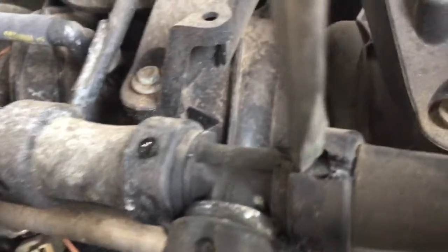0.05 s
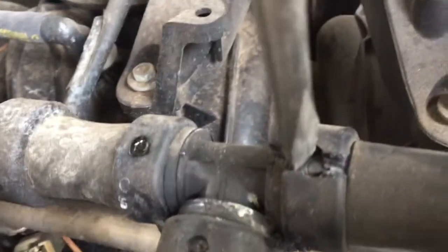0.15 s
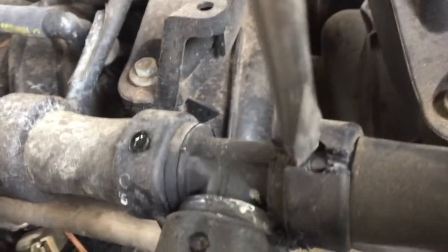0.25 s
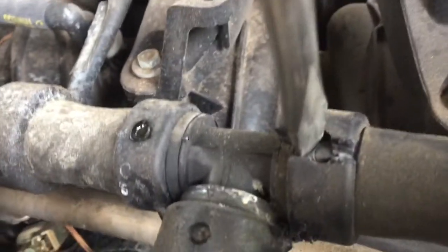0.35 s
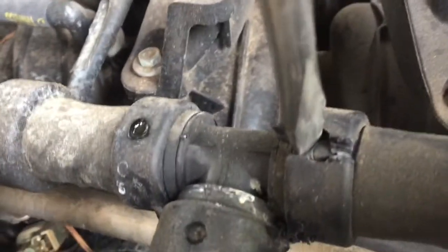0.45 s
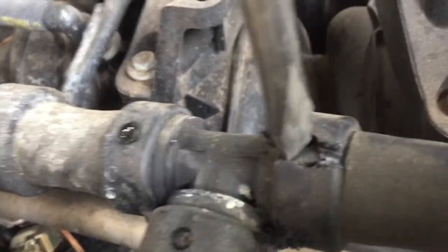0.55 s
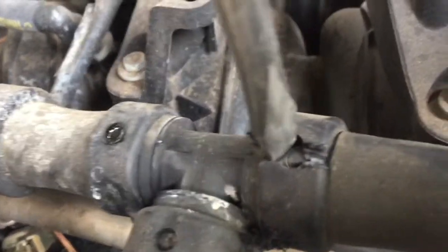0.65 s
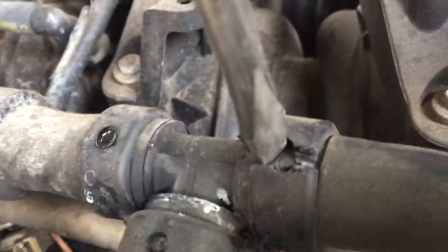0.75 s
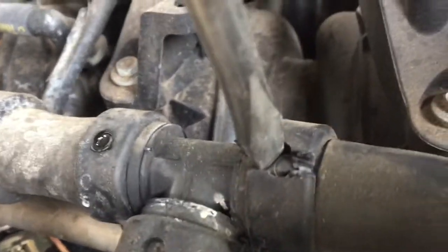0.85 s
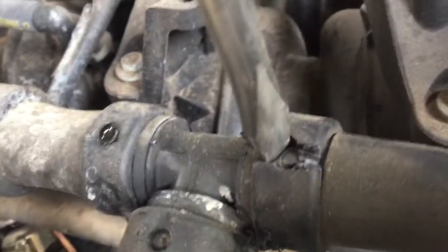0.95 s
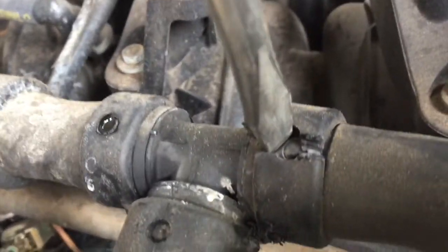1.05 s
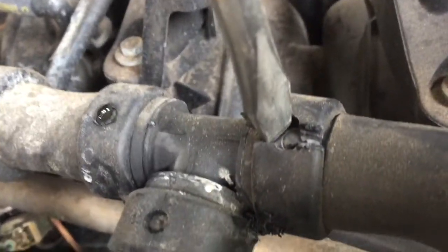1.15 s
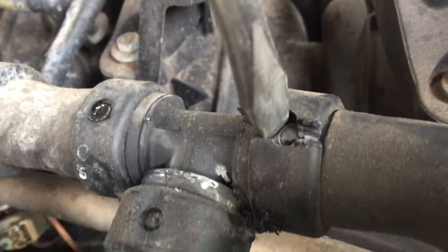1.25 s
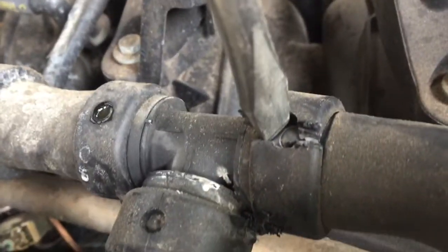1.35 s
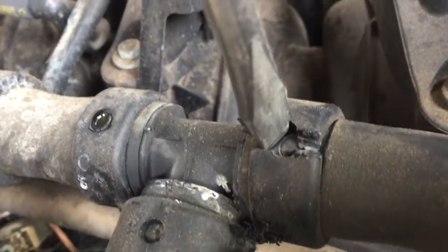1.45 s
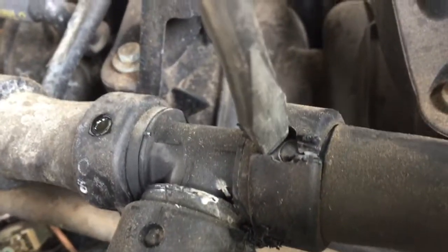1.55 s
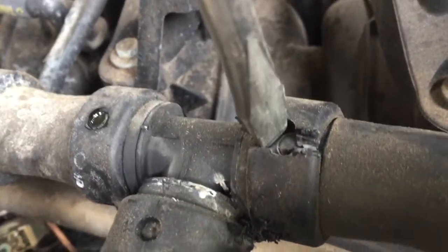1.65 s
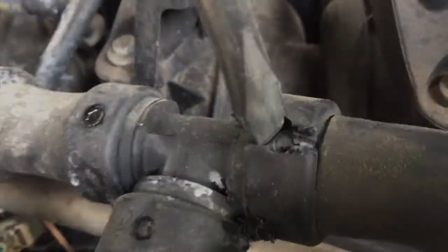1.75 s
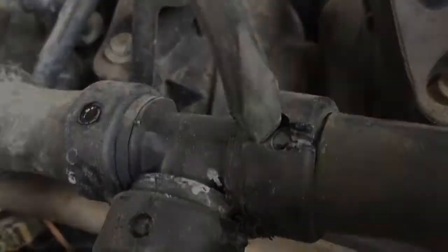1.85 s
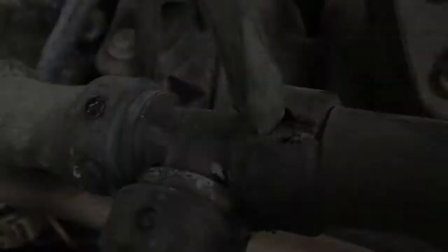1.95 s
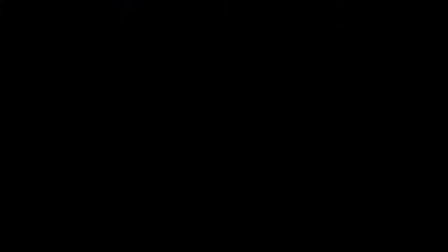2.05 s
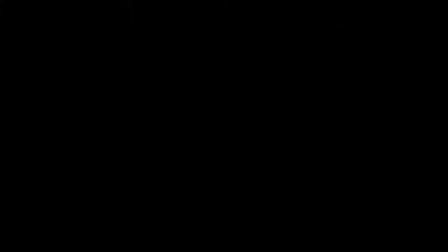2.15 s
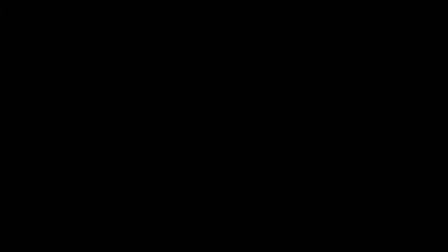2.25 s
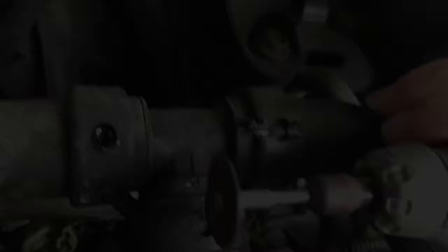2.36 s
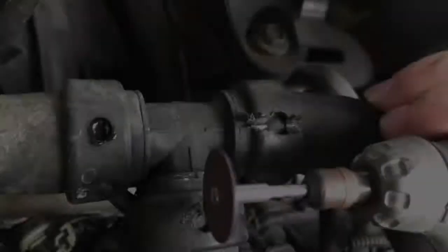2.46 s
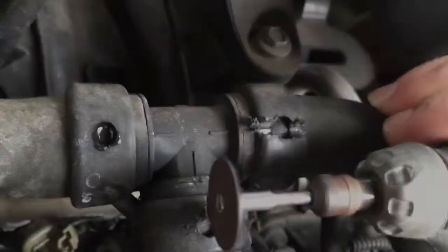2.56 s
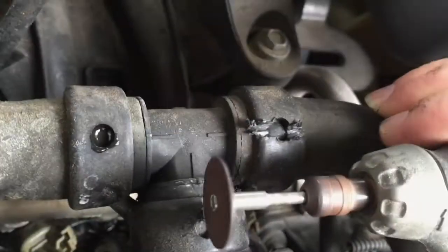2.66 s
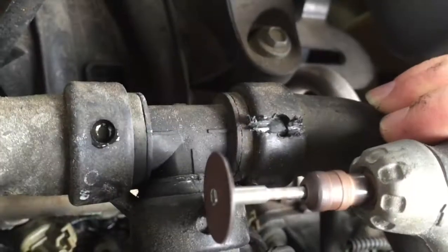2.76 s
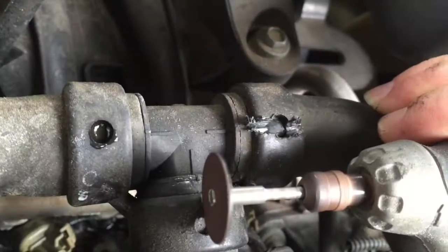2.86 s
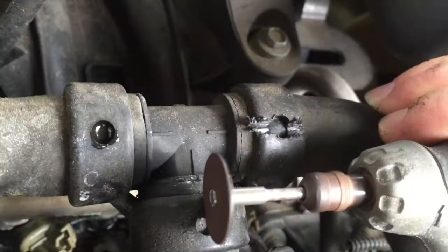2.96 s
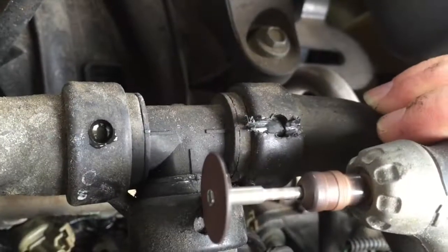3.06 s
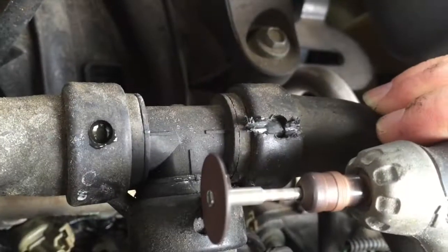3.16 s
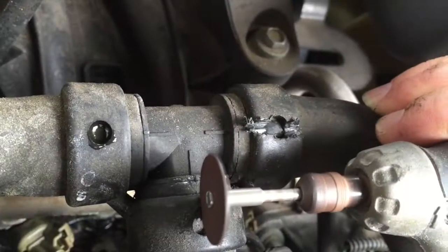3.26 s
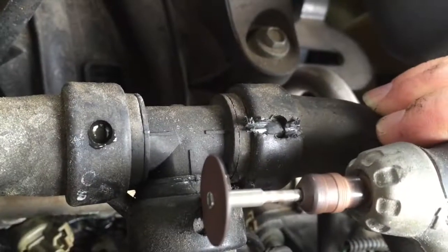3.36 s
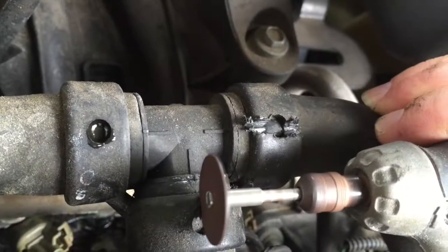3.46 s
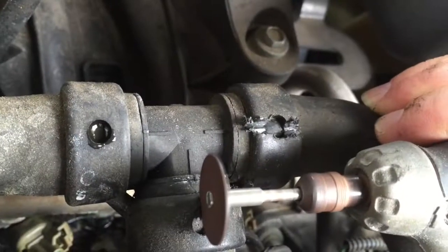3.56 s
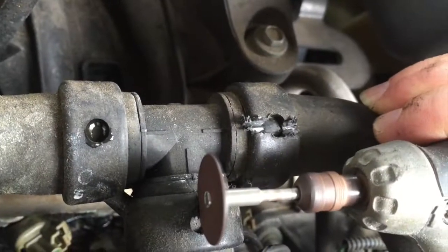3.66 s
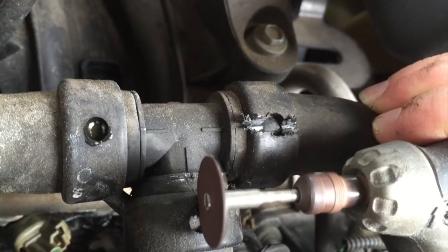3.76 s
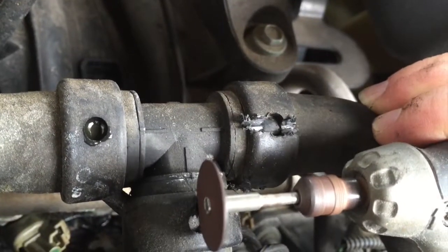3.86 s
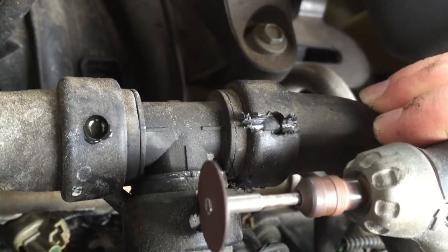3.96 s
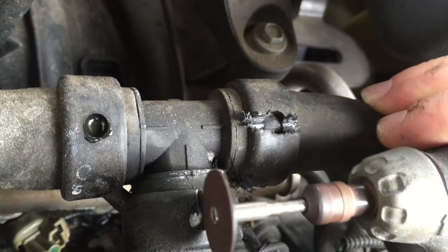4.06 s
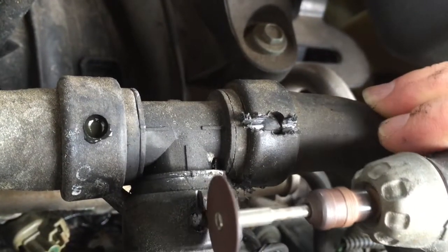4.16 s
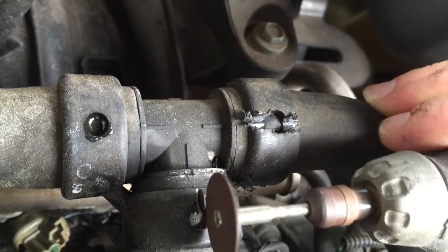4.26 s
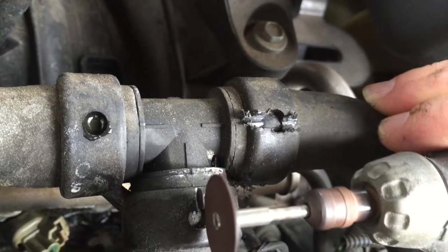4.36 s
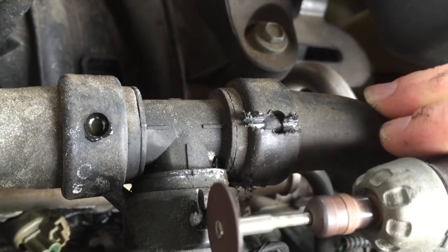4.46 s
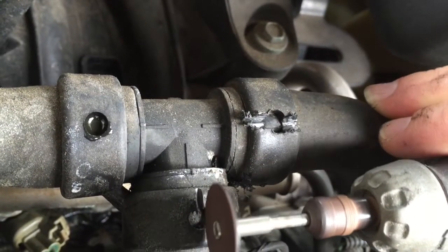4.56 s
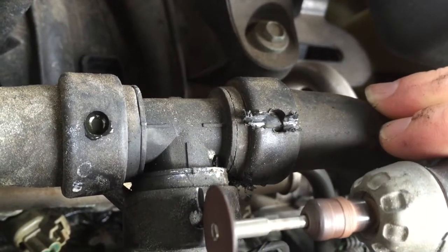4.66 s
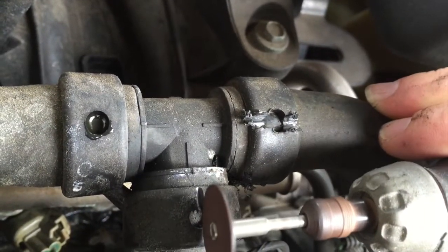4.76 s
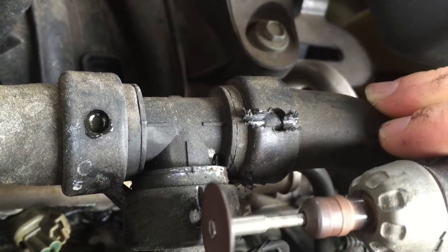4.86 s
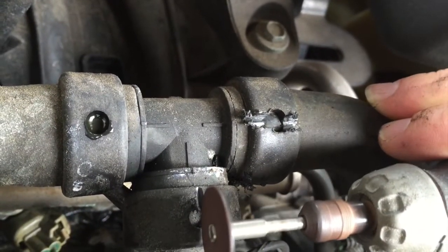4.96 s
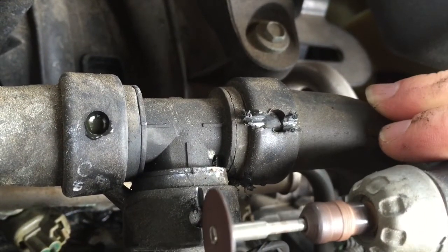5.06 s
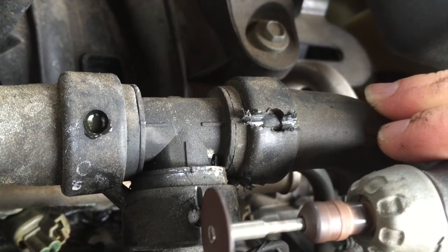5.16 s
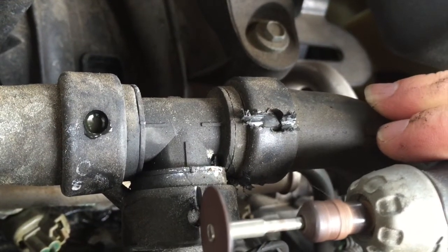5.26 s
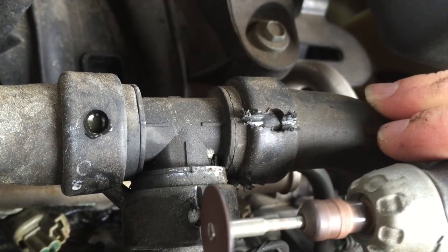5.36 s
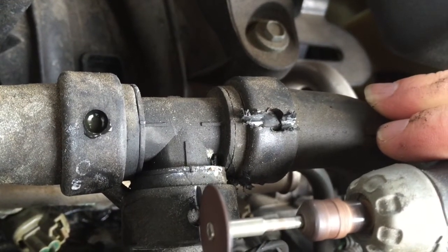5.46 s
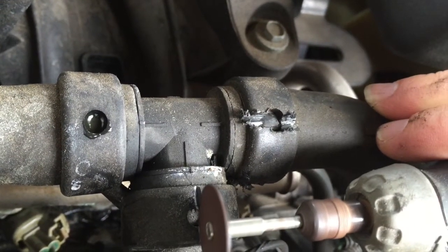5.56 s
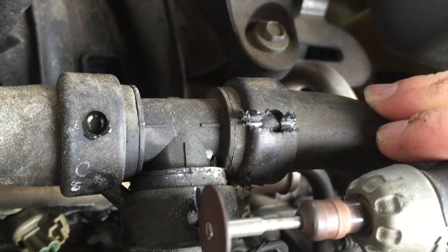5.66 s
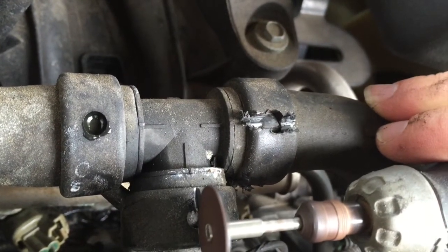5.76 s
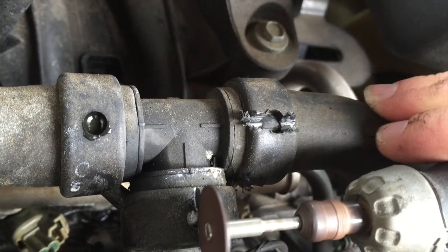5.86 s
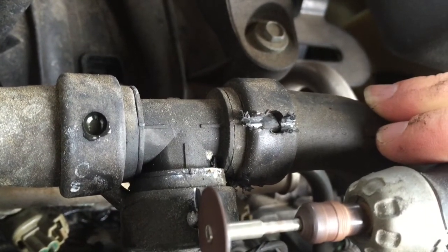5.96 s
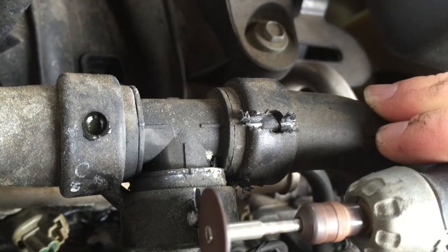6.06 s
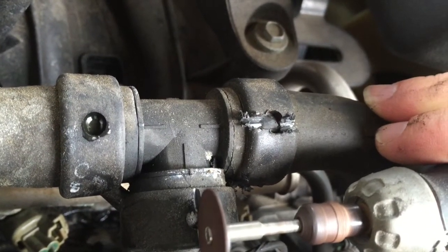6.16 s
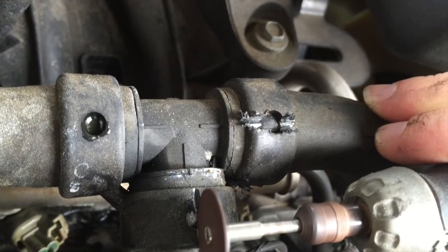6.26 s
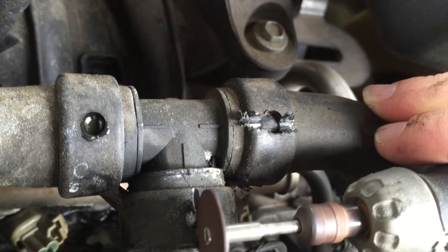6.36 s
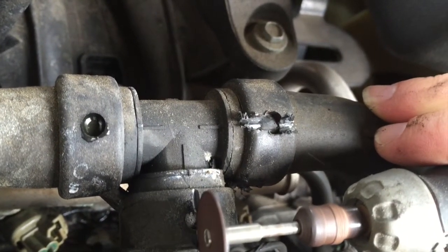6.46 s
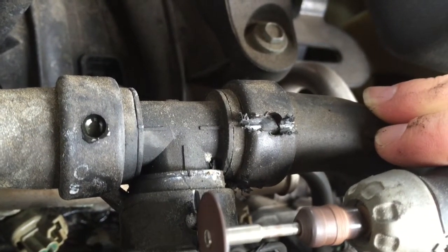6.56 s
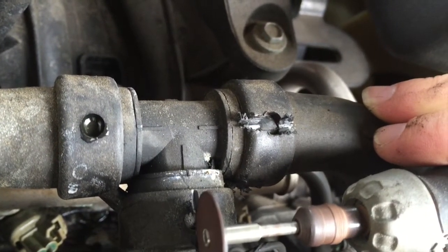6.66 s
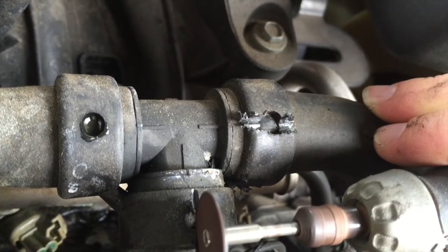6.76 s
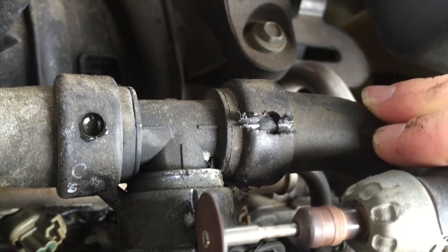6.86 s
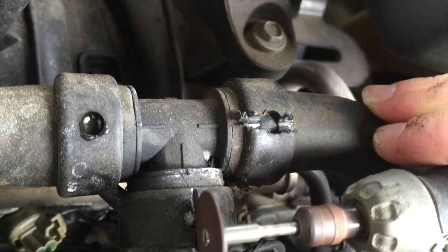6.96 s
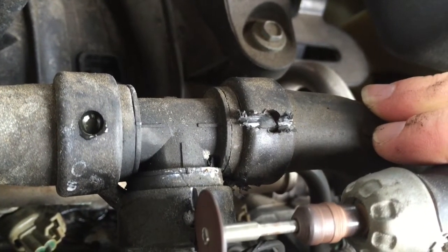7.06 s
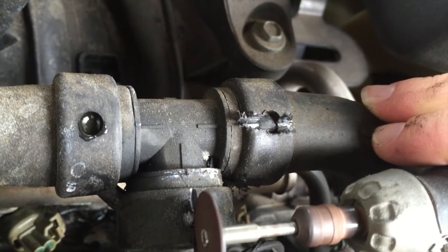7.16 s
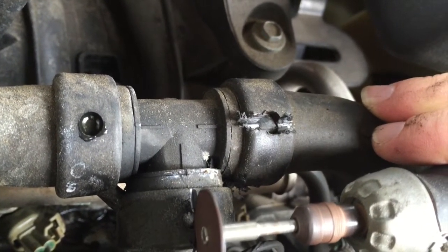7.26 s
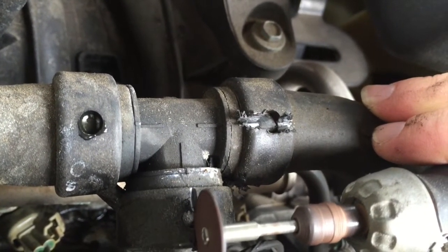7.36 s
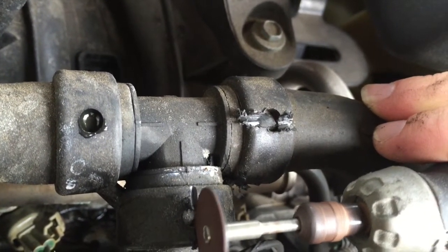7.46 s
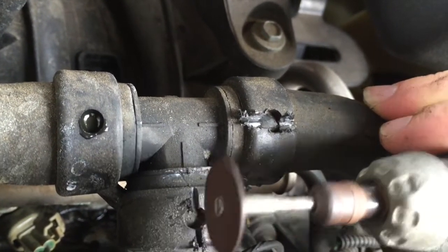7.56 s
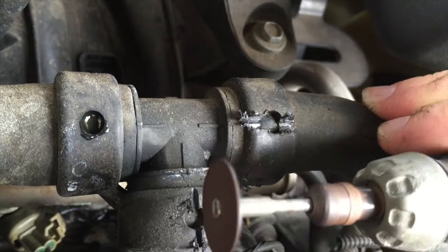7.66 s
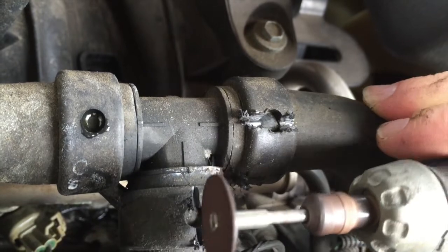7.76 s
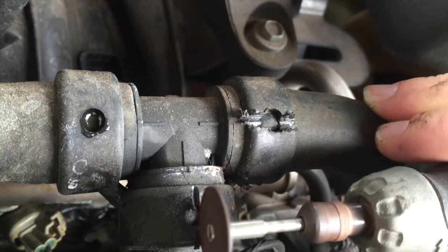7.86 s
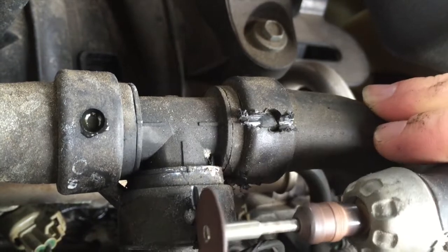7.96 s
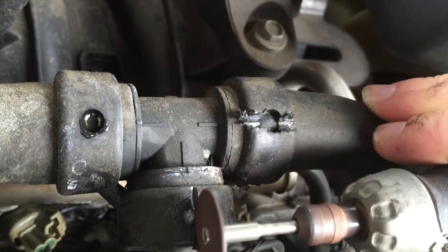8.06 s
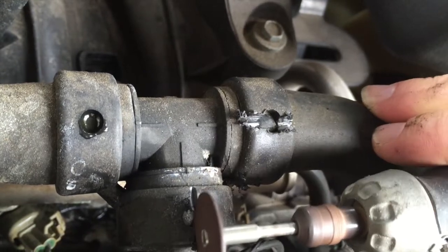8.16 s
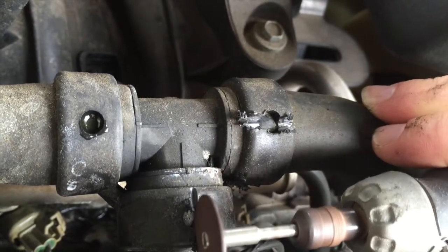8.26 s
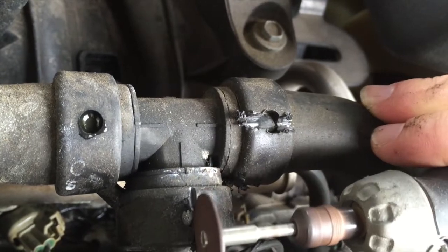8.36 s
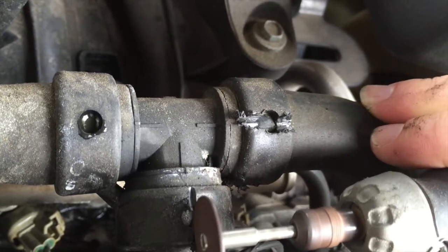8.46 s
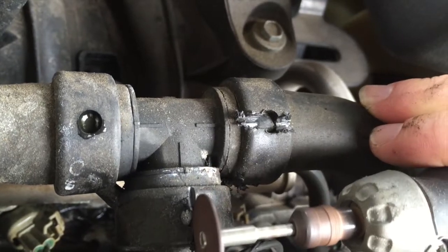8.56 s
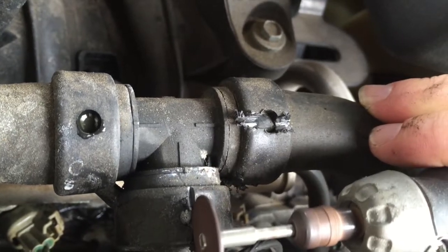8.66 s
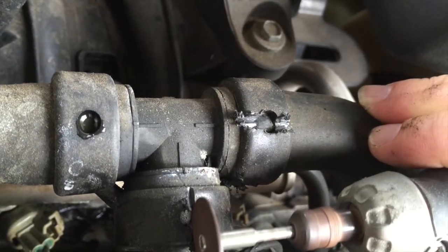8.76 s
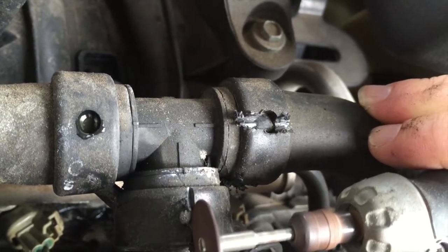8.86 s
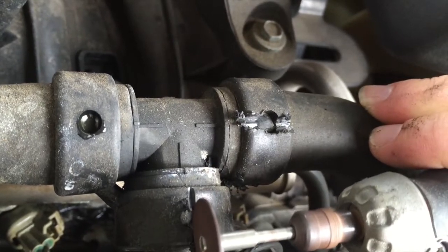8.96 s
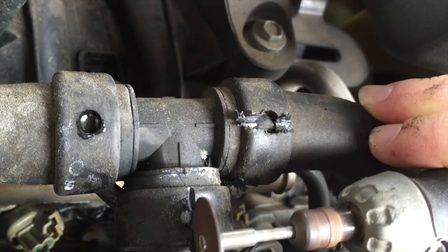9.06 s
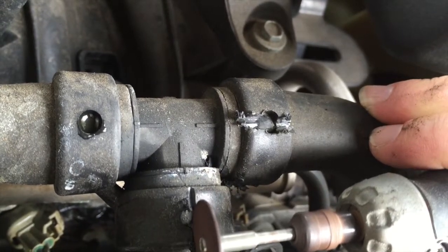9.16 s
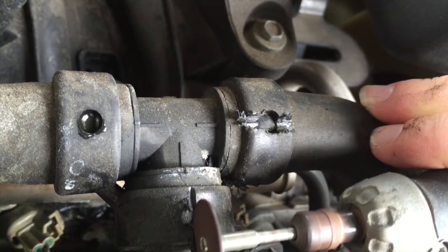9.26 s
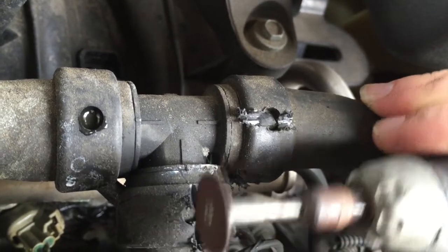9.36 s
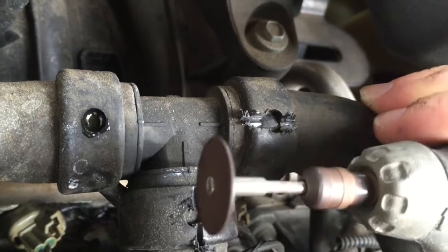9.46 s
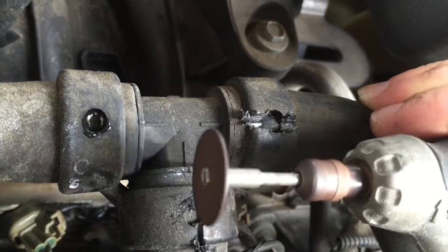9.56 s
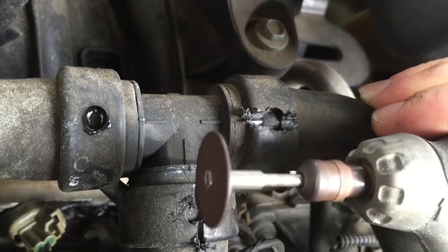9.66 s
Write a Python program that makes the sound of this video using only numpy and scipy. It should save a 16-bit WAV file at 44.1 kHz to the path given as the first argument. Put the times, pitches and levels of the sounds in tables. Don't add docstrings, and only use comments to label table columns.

```python
import sys
import numpy as np
from scipy import signal
from scipy.fft import rfft, irfft, next_fast_len
from scipy.io import wavfile
from scipy.ndimage import uniform_filter1d, map_coordinates

SR = 44100
rng = np.random.default_rng(int(sys.argv[2]) if len(sys.argv) > 2 else 0)


def waveform_to_disk(signal):
    frames = np.transpose(np.atleast_2d(signal))
    scaled = np.clip(frames, -1, 1) * 32767
    samples = np.round(scaled).astype(np.int16)
    wavfile.write(sys.argv[1], SR, samples)


def boost(x):
    u = np.asarray(x, float) / 20
    return 10 ** u


N = 428652
FREE_HZ = 132.75


def unit(x):
    return x / np.sqrt(np.mean(x ** 2) + 1e-20)


def curves(rows):
    s, *cols = np.transpose(rows)
    return [np.interp(np.arange(N) / SR, s, c) for c in cols]


def wobble(rate):
    knots = rng.standard_normal(int(N * rate / SR) + 4)
    return map_coordinates(knots, [np.arange(N) * rate / SR])


def filtered(x, response):
    m = next_fast_len(N + SR // 2)
    return irfft(rfft(x, m) * response(np.fft.rfftfreq(m, 1 / SR)), m)[:N]


def colour(points):
    f, v = np.transpose(points)
    return lambda hz: boost(np.interp(np.log(hz + 1), np.log(f), v))


def modes(rows):
    def mode(f, centre, width, db):
        return boost(db) * 1j * f * width / (centre * centre - f * f + 1j * f * width)
    return lambda f: sum((-1) ** k * mode(f, *row) for k, row in enumerate(rows))


def band(f, lo, hi):
    return 1 / ((1 + lo / (1j * f + 1)) * (1 + 1j * f / hi)) ** 2


def steady(x):
    power = uniform_filter1d(uniform_filter1d(x * x, size=3000), size=3000)
    return x / np.sqrt(np.abs(power) + 1e-12)


def yard():
    # (frequency [Hz], level [dB per Hz])
    rumble_colour = [(15, -55), (25, -32), (44, -26), (80, 0), (119, -9), (173, -8.5), (190, -13.5),
                     (420, -28.5), (550, -64), (920, -120)]
    # (frequency [Hz], level [dB per Hz])
    hiss_colour = [(250, -33), (420, -4.5), (1070, -3.5), (1370, -8.5), (4960, -16.5), (6820, -19.5),
                   (14300, -28), (15700, -37)]
    # (frequency [Hz], level [dB])
    hum_tones = [(54, -60), (163, -58)]
    # (time [s], level [dB])
    drone_swell = [(0.0, -54.5), (0.73, -67), (0.8, -57), (0.97, -62), (1.22, -54), (2.04, -56),
                   (2.19, -65)]
    t = np.arange(N) / SR
    hum = np.zeros(N)
    for hz, db in hum_tones:
        hum += boost(db - 1.5 + 2.7 * wobble(5.9)) * np.sin(2 * np.pi * hz * t + 0.42 * wobble(10.0))
    drone = unit(filtered(rng.standard_normal(N), lambda f: modes([(116, 14, 0)])(f) ** 2))
    rumble = unit(filtered(rng.standard_normal(N), colour(rumble_colour)))
    hiss = unit(filtered(rng.standard_normal(N), colour(hiss_colour)))
    return hum + boost(curves(drone_swell)[0] + 3.5) * drone + boost(-57.5) * rumble + boost(-73.5) * hiss


def small_sounds():
    # (time [s], peak level [dB], pitch [Hz])
    thuds = [
        (0.793, -39, 158),
        (1.207, -39, 141),
    ]
    # (time [s], peak level [dB], 60 dB decay [s], highest treble [dB])
    tick_hits = [
        (1.719, -48, 0.093, -12),
        (4.206, -41, 0.042, 13),
        (.797, -64, .03, -10),
    ]
    # (frequency [Hz], width [Hz], level [dB])
    tick_ring = [(1300, 68, 7), (2640, 300, 5.5), (6340, 1100, 3), (8600, 3000, -4)]
    # (time [s], level [dB])
    chirps = [(.09, -76), (.4, -75), (.68, -80), (.95, -80), (1.24, -79), (1.53, -82)]
    out, ticks, t = np.zeros(N + SR), np.zeros(N + SR), np.arange(SR // 4) / SR
    onset = 1 - np.exp(-t / 0.0032)
    for s, db, hz in thuds:
        push = np.sin(2 * np.pi * hz * t) + 0.23 * np.sin(3.4 * np.pi * hz * t)
        out[round(s * SR):][:len(t)] += boost(db - 60 * t / 0.16) * onset * push
    for s, db, t60, top_db in tick_hits:
        puff = boost(db - 60 * t / t60) * onset * rng.standard_normal(len(t))
        ticks[round(s * SR):][:len(t)] += puff
        out[round(s * SR):][:len(t) - 6] += boost(top_db) * np.diff(puff, 6) / 30
    for s, db in chirps:
        flutter = 1 + 4.8 * uniform_filter1d(rng.standard_normal(len(t)), size=40)
        trill = (t < .09) * np.sin(np.pi * 36 * t) ** 2 * flutter
        out[round(s * SR):][:len(t)] += boost(db - 4) * trill * np.sin(2 * np.pi * 6920 * t)
    return out[:N] + boost(1.5) * filtered(ticks[:N], modes(tick_ring))


def shaft():
    # (time [s], speed [Hz])
    loaded = [
        [(2.74, 133.6), (2.95, 130.2), (3.132, 124), (3.376, 111.5), (3.486, 107.7), (3.684, 94.5),
         (3.766, 92.66), (3.952, 105.7), (4.08, 113.7)],
        [(4.69, 132.4), (4.95, 129.1), (5.28, 123.5), (5.6, 114), (5.74, 105.6), (5.96, 95.2)],
        [(5.96, 95.3), (6.09, 97.85), (6.57, 88.6), (6.8, 86.47), (6.97, 89.3), (7.14, 83.7), (7.28, 80.4),
         (7.46, 84.98), (7.53, 92.4)],
        [(7.9, 133.5), (8.05, 123.5), (8.17, 109.1), (8.426, 96.04), (8.74, 88.06), (9.026, 84.96),
         (9.1, 83.75), (9.338, 89.86), (9.4, 98.6)],
    ]
    fresh_hz, settle_s = .5, .3
    recover_s, creep_s, creep_share = .062, .3, .06
    t = np.arange(N) / SR
    speed, = curves([row for part in loaded for row in part])
    fresh = FREE_HZ + fresh_hz * np.exp(-np.abs(t - 1.762) / settle_s)
    speed = np.where(t < loaded[0][0][0], fresh, speed)
    next_bites = [later[0][0] for later in loaded[1:]] + [N / SR]
    for part, until in zip(loaded, next_bites):
        s, hz = part[-1]
        since = np.abs(t - s)
        lack = (1 - creep_share) * np.exp(-since / recover_s) + creep_share * np.exp(-since / creep_s)
        speed = np.where((t > s) & (t < until), FREE_HZ - (FREE_HZ - hz) * lack, speed)
    return speed, np.cumsum(speed * (1 + 0.000935 * wobble(30))) / SR


def sunk(speed):
    lost = np.maximum(FREE_HZ - speed, 0)
    return lost, 1 - np.exp(-lost / 4.66)


def motor(speed, turns):
    clear_orders = [8, 12, 13, 14, 15, 16, 18, 22, 23, 24, 25, 31, 32]
    clear_db = [-23, -27, -26, -23, -18, 0, -14, -25, -27, -18, -18, -24, -23]
    # (frequency [Hz], level [dB])
    housing = [(1070, -6), (1700, -9), (1990, -13), (2170, 0), (2650, -11), (3250, -4), (4300, -5),
               (9000, -6)]
    # (frequency [Hz], level [dB per Hz])
    air_colour = [(150, -55), (250, -18), (906, -20.5), (1060, -12.5), (1260, -19), (1880, -5), (2160, -11),
                  (2530, -19), (3280, -17.5), (3520, -13.5), (4260, -17.5), (4820, -29), (5630, -20),
                  (12300, -32), (16000, -39)]
    # (frequency [Hz], width [Hz], level [dB])
    vents = [(8700, 310, -24), (12200, 1000, -7)]
    slots_db, pulling_db = 6, 8
    multiple = np.arange(8, 113)
    db = -33 - .2 * (multiple - 30) + 2.5 * rng.standard_normal(len(multiple))
    db[(multiple % 8 < 2) & (multiple > 30)] += slots_db
    db[np.isin(multiple, clear_orders)] = clear_db
    at_free_speed = colour(housing)(multiple * speed.max())
    one_turn = np.arange(4096) / 4096
    start = rng.uniform(0, 2 * np.pi, (len(db), 1))
    waves = np.sin(2 * np.pi * multiple[:, None] * one_turn + start)
    slot = (multiple % 8 == 0) & (multiple > 16) & (multiple < 50)
    shapes = boost(db) / at_free_speed * [slot, ~slot] @ waves
    slots, others = shapes[:, (turns % 1 * len(one_turn)).astype(int)]
    pulling = 1 - np.exp(-sunk(speed)[0] / 1.2)
    lines = filtered(boost(pulling_db * pulling) * slots + others, colour(housing))
    lines *= boost(5.5 + 0.68 * wobble(25))
    throb = 1 + 0.34 * np.sin(4 * np.pi * turns) + 0.052 * np.sin(2 * np.pi * turns)
    whistle = lambda f: 1 + np.abs(modes(vents)(f))
    air = unit(filtered(throb * rng.standard_normal(N), lambda f: colour(air_colour)(f) * whistle(f)))
    u = np.clip((np.arange(N) / SR - 1.762) / 0.95, 0, 1)
    fade = u * u * (3 - 2 * u)
    slowing = np.log2(speed / speed.max())
    return boost(-37) * fade * (boost(17.3 * slowing) * lines + boost(-6.5 + 5.1 * slowing) * air)


def hand():
    # (time [s], level [dB])
    presses = [
        [(2.775, -41.5), (2.91, -37.5), (3.02, -37), (3.108, -24.5), (3.212, -30.5), (3.298, -29.5),
         (3.69, -30.5), (4.06, -32.5), (4.14, -49.5)],
        [(4.62, -40.5), (4.72, -35.5), (4.78, -28.5), (4.91, -32.5), (5.08, -28.5), (5.3, -31.5), (5.42, -27),
         (5.56, -30), (5.65, -33)],
        [(5.65, -35), (5.71, -26), (5.87, -30.5), (6.2, -30.5), (6.27, -27), (6.66, -28), (7.24, -26),
         (7.42, -29), (7.58, -47.5)],
        [(7.86, -43.5), (8.0, -19), (8.2, -33), (8.304, -30.5), (8.466, -32), (8.81, -26), (9.104, -32),
         (9.27, -23.5), (9.43, -47.5)],
    ]
    # (time [s], half width [s], extra on part [dB], extra on wheel and grit [dB])
    slips = [(2.79, 0.047, -2.5, 14), (2.86, 0.029, 0, 11), (4.64, 0.027, 1.5, 3), (4.69, 0.017, -4, -9),
             (3.0, 0.048, 8.5, 1.5), (3.211, 0.054, -2, 5), (3.43, 0.022, 3.5, 0.5), (3.861, 0.046, 9, -2),
             (5.2, .25, 1, 4), (5.65, 0.095, 2.5, 4), (6.511, .1, 0, 2.5), (6.95, 0.071, 2, 2),
             (7.04, 0.077, -3.5, -1.5), (7.34, .04, -1.5, 3), (7.44, 0.012, -6, 1), (7.501, 0.018, 9, -8),
             (8.001, .08, -8, -2.5), (8.281, 0.022, 4, 4), (8.515, 0.021, 6, 0.5), (8.921, 0.042, 0, 3),
             (9.28, 0.067, -0.5, -3), (9.4, 0.026, 2, 2.5), (7.53, 0.018, -3.5, 8), (4.091, .015, 3, -2),
             (4.8, 0.053, -0.5, -3), (8.75, .1, 0, -1.5)]
    # (finest grit at start [dB], at end [dB], knocking [dB])
    passes = [
        (4, -2, -2.5),
        (-7.5, -1, 1),
        (-3, -3.5, 0),
        (3, -13, 1),
    ]
    t = np.arange(N) / SR

    def edged(cut):
        first, last = cut[0][0], cut[-1][0]
        return [(first - .02, -140), (first - .012, -70), *cut, (last + .03, -140)]

    press_db = np.max([curves(edged(cut))[0] for cut in presses], axis=0)
    bumps = np.array([np.exp(-((t - s) / width) ** 2) for s, width, *_ in slips])
    part_db, rim_db = np.array(slips)[:, 2:].T @ bumps
    ends = []
    for cut, (start_db, end_db, knock_db) in zip(presses, passes):
        ends += [(cut[0][0], start_db, knock_db), (cut[-1][0], end_db, knock_db)]
    return press_db + part_db, rim_db, *curves(ends)


def bounce(speed):
    # (start [s], end [s], weakness of second strikes [dB], extra roughness [0-1])
    bounces = [
        (3.04, 3.234, 15, 0.07),
        (4.738, 5.42, 40, 0.22),
        (7.292, 7.359, 8.5, 0.57),
        (8.03, 8.106, 8, 0.13),
        (9.36, 9.42, 14, 0),
    ]
    jump_s, calm_s = 0.032, 0.21
    lost, depth = sunk(speed)
    weak_db, rough = -1.5, 0.46 * depth ** 2
    for start, end, db, extra in bounces:
        jumping, = curves([(start, 0), (start + jump_s, 1), (end, 1), (end + calm_s, 0)])
        weak_db, rough = weak_db + db * jumping ** 2, rough + extra * jumping
    return weak_db, rough, 0.74 + 0.53 * depth + 0.0027 * lost


def strikes(speed, turns):
    # (time [s], extra level [dB])
    clear = [(2.7793, 2), (2.954, 2), (3.133, 4), (3.4248, 0), (3.585, 2), (3.785, 1), (4.6279, -2),
             (4.773, 4.5), (4.8933, 2.5), (5.0458, 4.5), (5.1705, 2), (5.3123, -1), (5.4609, -1),
             (5.6538, 1), (5.7948, 1), (5.954, 2.5), (6.2641, 0), (6.4824, 1), (6.7073, 2), (6.9016, 1),
             (7.0508, 2), (7.2154, -2.5), (7.372, 1.5), (7.4706, 7), (8.097, -6), (8.2585, 1), (8.4686, 4),
             (8.687, 4), (8.8917, -7), (9.2077, -1)]
    weak_db, rough, contact_ms = bounce(speed)
    at = (np.array(clear)[:, 0] * SR).astype(int)
    slip = [0.]
    for i in at:
        step = 2 if weak_db[i] > 6 else 1
        slip.append(np.round((turns[i] + slip[-1]) / step) * step - turns[i])
    turns = turns + 2 + np.interp(np.arange(N), at, slip[1:])
    turn = turns.astype(int)
    luck = rng.standard_normal((turn.max() + 2, 2))
    luck = .75 * luck + .66 * np.roll(luck, 1, axis=0)
    hard_db = np.zeros(len(luck))
    hard_db[np.round(turns[at]).astype(int)] = np.array(clear)[:, 1]
    contact_s = contact_ms * boost(2.75 * rough * luck[turn, 1]) / 1000
    u = (turns % 1) / speed / contact_s
    strike_db = 2.5 * rough * luck[turn, 0] + hard_db[turn] - weak_db * (turn % 2)
    force = boost(strike_db) * u ** 1.26 * np.exp(1.2 * (1 - u))
    force += 0.24 * boost(-.4 * weak_db)
    rim = rng.standard_normal((turn.max() // 6 + 3, 401))
    grain = unit(map_coordinates(rim, [turns / 6, turns % 1 * 400], order=1))
    rough = np.clip(rough, 0, 1)
    return force, force * (np.sqrt(1 - rough) * grain + np.sqrt(rough) * rng.standard_normal(N))


def part_ring(scrape):
    # (frequency [Hz], width [Hz], level [dB])
    part_modes = [(1389, 210, -11.5), (1565, 114, -4), (1776, 127.4, 4), (1896, 191, 1.5),
                  (2132, 150, -7.5)]
    return steady(filtered(scrape, lambda f: modes(part_modes)(f) * band(f, 2080, 3550)))


def wheel_ring(scrape):
    # (frequency [Hz], width [Hz], level [dB])
    wheel_modes = [(2564, 28, 3.5), (2990, 163, 3.5), (3447, 148, 4), (3700, 88, 4.5), (4020, 260, 7),
                   (4350, 430, 5.5)]
    return steady(filtered(scrape, lambda f: modes(wheel_modes)(f) * band(f, 4000, 8400)))


def grit_spray(scrape, sparkle_db):
    # (frequency [Hz], level [dB per Hz])
    grit_colour = [(2760, -73), (4700, 5.5), (4910, 5), (6130, 10), (6490, 7.5), (6770, 6.5), (7290, 8.5),
                   (8350, 7.5), (9960, -2), (10400, -46), (13500, -48), (22000, -120)]
    # (frequency [Hz], level [dB per Hz])
    sparkle_colour = [(6120, -27.5), (10400, -3.5), (10900, -5.5), (12100, 5), (12500, 8.5), (13200, -3),
                      (15100, 5.5), (16000, -27)]
    grit = steady(filtered(scrape, colour(grit_colour)))
    return grit + boost(sparkle_db - 3.5) * steady(filtered(scrape, colour(sparkle_colour)))


def hose_knock(force, scrape):
    # (frequency [Hz], width [Hz], level [dB])
    hose_modes = [(277, 67, -3), (393, 60, -3.5), (573, 105, 2.5), (782, 186, 2.5), (988, 42.5, 7),
                  (1072, 47, -0.5)]
    blows = unit(np.diff(force, prepend=0)) + unit(scrape)
    hoses = np.zeros(N)
    for k, row in enumerate(hose_modes):
        hoses += (-1) ** k * boost(2.4 * wobble(6)) * filtered(blows, modes([row]))
    return steady(hoses) * boost(2.1 * wobble(14))


def tool_shake(force, speed, part_db):
    # (frequency [Hz], width [Hz], level [dB])
    grip_modes = [(59, 39, -8.5), (88.6, 8.7, -2.5), (205.3, 36, 6)]
    # (time [s], half width [s], shake [dB])
    grip_changes = [
        (3.2, 0.11, -1.5),
        (5.56, 0.051, 4),
        (7.5, 0.13, 3.5),
        (8.02, 0.093, -1.5),
        (9.35, 0.11, 2),
    ]
    t = np.arange(N) / SR
    shake_db = -41 - 16 * (1 - sunk(speed)[1]) - 0.056 * bounce(speed)[0]
    shake_db += 2 * np.minimum(part_db + 41, 0) + 1.36 * wobble(8)
    for s, width, db in grip_changes:
        shake_db += db * np.exp(-((t - s) / width) ** 2)
    shake = filtered(steady(force), lambda f: modes(grip_modes)(f) / (1 + 1j * f / 300))
    return boost(shake_db) * unit(shake)


def cutting(speed, turns):
    light_db = -34
    force, scrape = strikes(speed, turns)
    lost, depth = sunk(speed)
    part_db, rim_db, sparkle_db, knock_db = hand()
    firm, light = np.maximum(part_db - light_db, 0), np.minimum(part_db - light_db, 0)
    wheel_db = -37.5 + 0.65 * firm + light - 0.0551 * lost + rim_db
    grit_db = -42 + 0.64 * firm + light - 0.04 * lost + 0.55 * rim_db
    sparkle_db = sparkle_db + 6.5 * (1 - depth)
    knock_db = knock_db - 47.5 + 0.81 * firm + light - 7 * (1 - depth)
    cut = boost(part_db) * part_ring(scrape) + boost(wheel_db) * wheel_ring(scrape)
    cut += boost(grit_db) * grit_spray(scrape, sparkle_db)
    return cut + boost(knock_db) * hose_knock(force, scrape) + tool_shake(force, speed, part_db)


def bay(x):
    t = np.arange(SR // 4) / SR
    tail = rng.standard_normal(len(t)) * boost(-60 * t / 0.1)
    return x + boost(-13.5) * signal.fftconvolve(x, tail / np.linalg.norm(tail))[:N]


def scene():
    speed, turns = shaft()
    return (yard() + small_sounds() + motor(speed, turns) + bay(cutting(speed, turns)))[None]


def top_cut(x):
    return signal.sosfilt(signal.butter(12, 16440, fs=SR, output="sos"), x)


def record(dry):
    def response(hz):
        bass = (hz / 33) ** 4
        return bass / (1 + bass) / (1 + (hz / 15800) ** 120)
    mix = filtered(dry[0], response)[None]
    return top_cut(mix)


dry = scene()
out = record(dry)
waveform_to_disk(out)
```